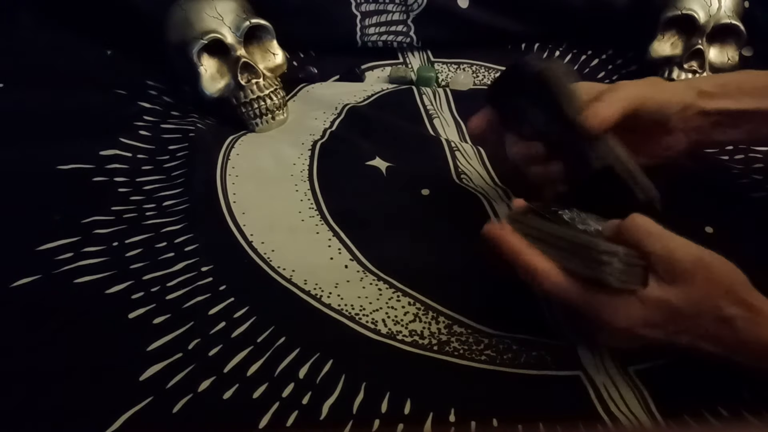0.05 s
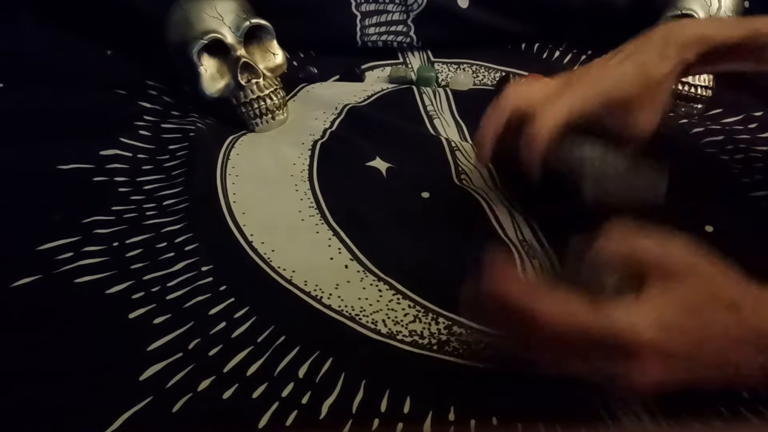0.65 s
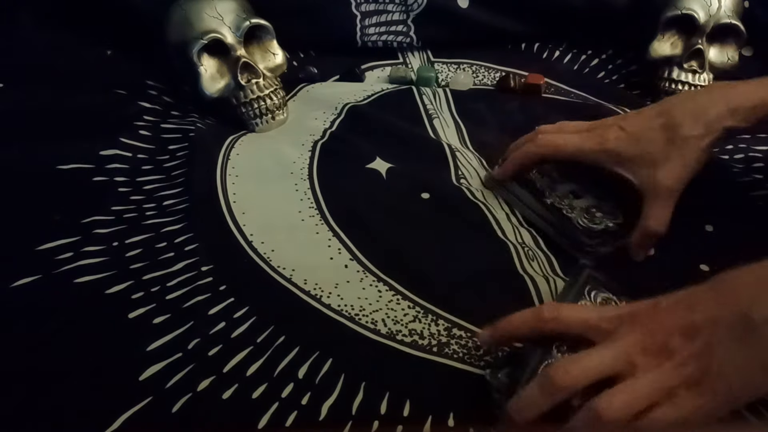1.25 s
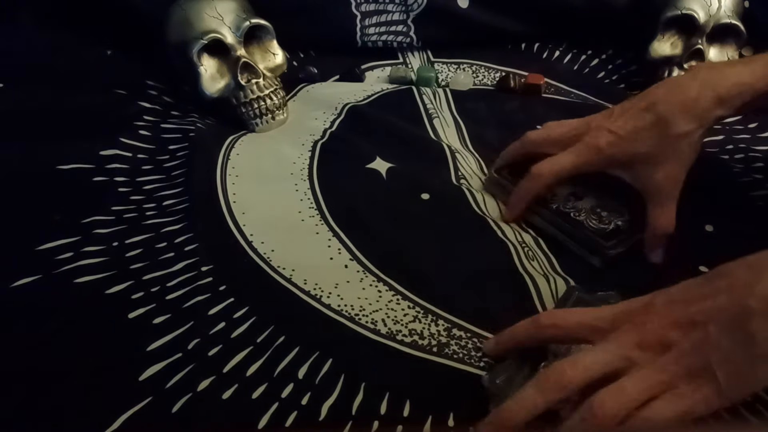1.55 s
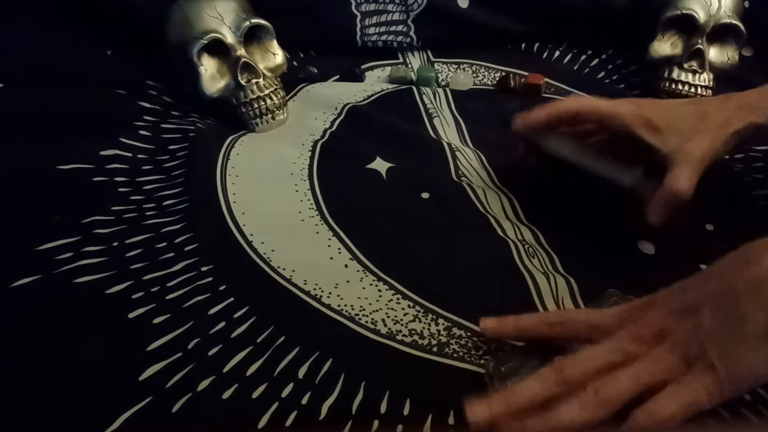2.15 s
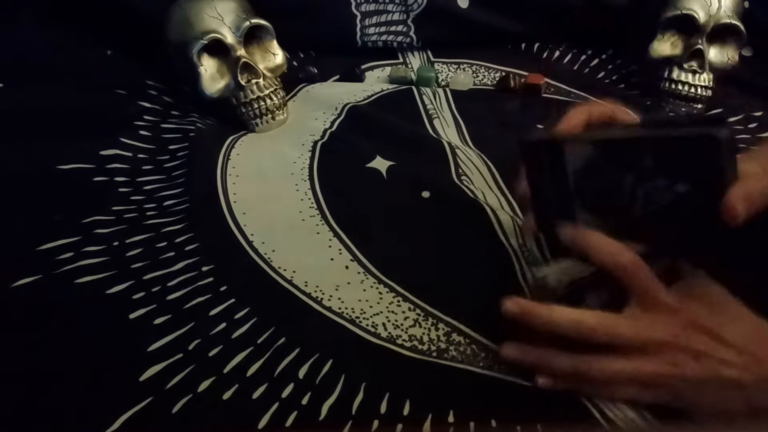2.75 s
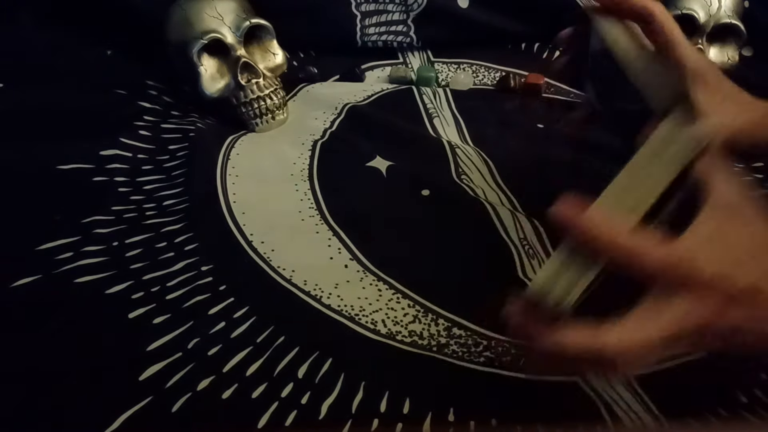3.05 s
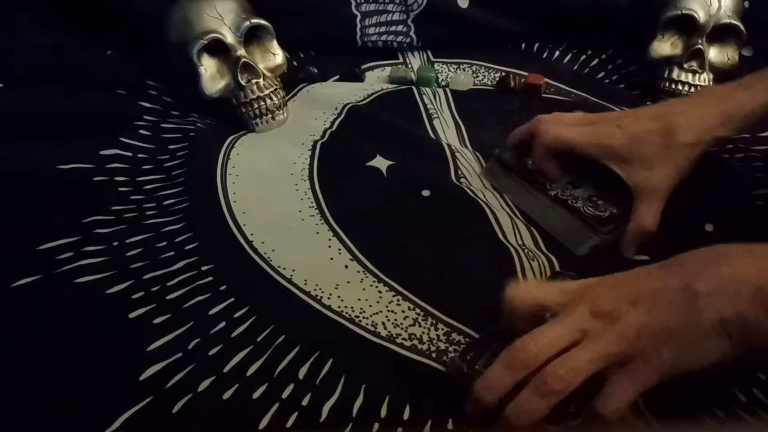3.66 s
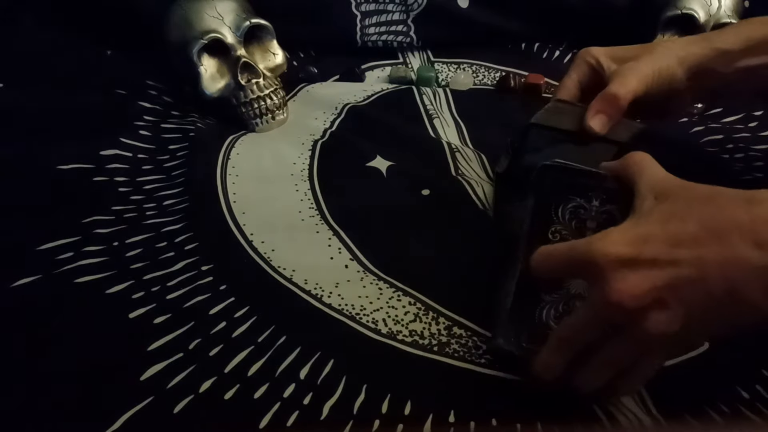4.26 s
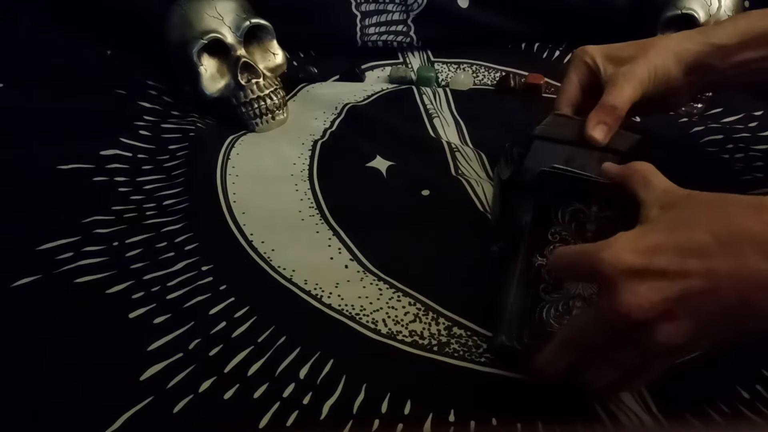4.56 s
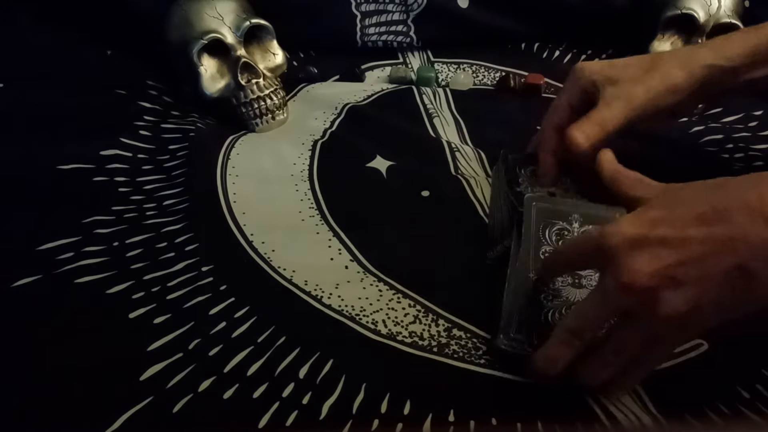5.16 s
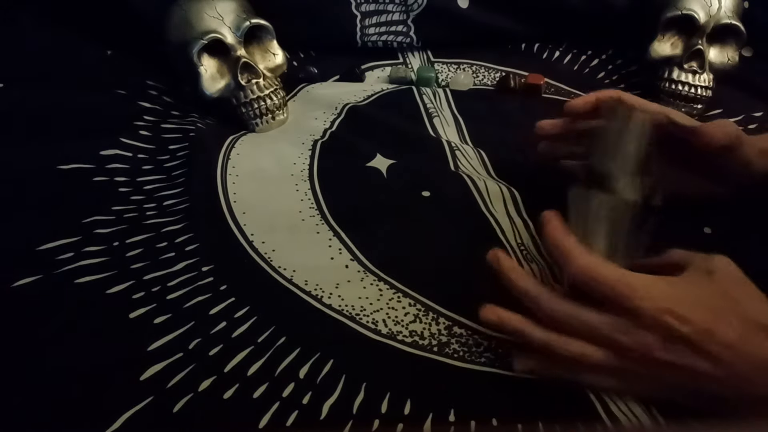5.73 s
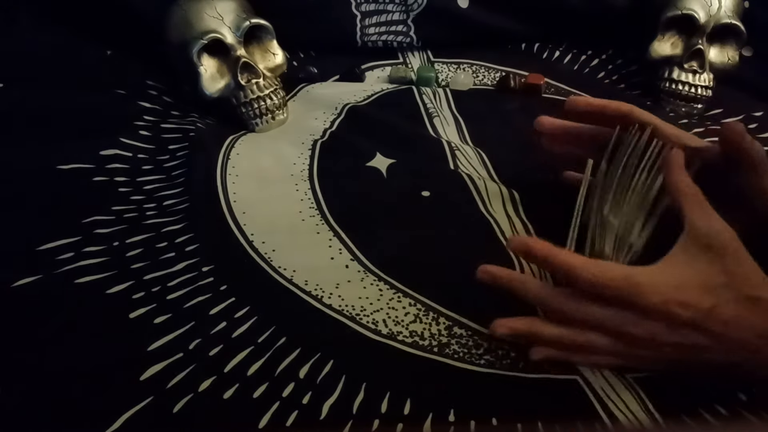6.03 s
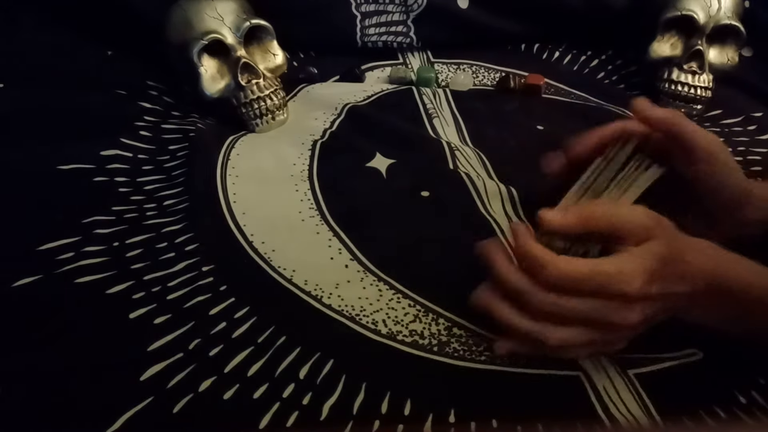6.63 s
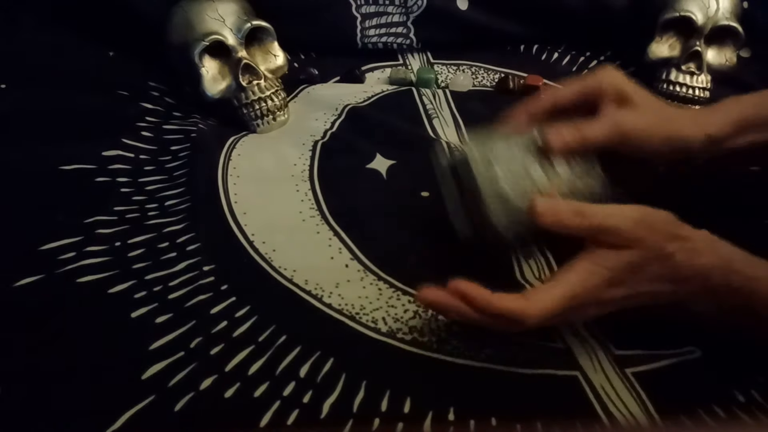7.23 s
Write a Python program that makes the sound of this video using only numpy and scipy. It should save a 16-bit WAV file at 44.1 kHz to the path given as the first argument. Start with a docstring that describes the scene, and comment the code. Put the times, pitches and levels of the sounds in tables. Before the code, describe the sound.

Hands handle and riffle shuffle playing cards on a cloth-covered table, with light knocks and slides, while a fan hums in a small room.

```python
"""Riffling a deck of cards

A deck is cut, riffled and squared by hand on a cloth-covered table in a small room.
Packets clack and ring the table; card faces hiss as they slide. In the riffle, bunches snap
off the thumbs with an edge click and a hollow flap, single cards ticking in between.
Near walls throw every snap back; a fan hums steadily."""
import sys
import numpy as np
from scipy import signal
from scipy.fft import rfft, irfft, next_fast_len
from scipy.io import wavfile
from scipy.ndimage import uniform_filter1d

SR = 44100
rng = np.random.default_rng(int(sys.argv[2]) if len(sys.argv) > 2 else 0)


def store_wav(level_fs):
    """Save 16-bit WAV to argv[1]."""
    pcm = np.round(np.clip(np.atleast_2d(level_fs), -1, 1) * 32767)
    wavfile.write(sys.argv[1], SR, pcm.T.astype(np.int16))


N = 325899
T = np.arange(N) / SR
RIFFLE_FROM_S, RIFFLE_TO_S = 4.29, 5.16

# hollow flap of a card: f/flap pitch, level/dB
FLAP_SPECTRUM = [(.04, -8), (.1, -2), (.2, -9.5), (.36, -15), (.55, -5.5), (.82, -1.5), (1.1, -2),
                 (1.4, -9), (1.7, -6), (2.1, -22), (4, -40)]
# click of its edge: f/Hz, level/dB
EDGE_SPECTRUM = [(1500, -41), (3000, -2.5), (3700, -2.5), (4800, 2), (6600, -4), (7700, -1), (9000, -5),
                 (11500, -2.5), (15500, -8.5), (17000, -54)]
# diffuse sound, left against right: f/Hz, coherence/1
COHERENCE = [(60, 0.95), (200, 0.95), (380, 0.9), (700, 0.69), (1300, 0.21), (2400, 0.24), (4400, 0),
             (16000, 0)]


def amp(db):
    """Decibels to gain."""
    return 10 ** (np.asarray(db) / 20)


def unit(x):
    """Scale to rms 1."""
    return x / np.sqrt(np.mean(x ** 2) + 1e-30)


def read(points, hz):
    """Interpolate a table over log frequency."""
    f, value = np.transpose(points)
    return np.interp(np.log(hz + 1), np.log(f + 1), value)


def add(mix, at_s, sound):
    """Mix a sound in, in place."""
    part = mix[..., max(round(at_s * SR), 0):][..., :sound.shape[-1]]
    part += sound[..., :part.shape[-1]]


def colour(x, spectrum, size=1024):
    """Minimum-phase filter with the given spectrum."""
    log_gain = np.log(amp(read(spectrum, abs(np.fft.fftfreq(size, 1 / SR)))))
    response = np.fft.ifft(np.exp(np.conj(signal.hilbert(log_gain)))).real
    return signal.fftconvolve(x, response[None], axes=1)[:, :x.shape[1]]


def shade(x, balance):
    """Tilt left against right by frequency, at constant total power."""
    size = next_fast_len(N)
    ratio = amp(read(balance, np.fft.rfftfreq(size, 1 / SR)))
    gains = np.array([ratio, np.ones_like(ratio)]) * np.sqrt(2 / (1 + ratio ** 2))
    return irfft(rfft(x, size) * gains, size)[:, :N]


def noise(gain_at):
    """Shaped stereo noise, rms 1, incoherent in the treble."""
    size = next_fast_len(N)
    hz = np.fft.rfftfreq(size, 1 / SR)
    left, other = rfft(rng.standard_normal((2, size)))
    same = read(COHERENCE, hz)
    right = same * left + np.sqrt(1 - same ** 2) * other
    return unit(irfft(np.array([left, right]) * gain_at(hz), size)[:, :N])


def crack(length_s, spectrum, chatter, width, swell=0.19, size=2048):
    """A click, then a burst of card on card that swells and stops; energy of 3 ms at rms 1."""
    t = np.arange(size) / SR
    shared, own = rng.standard_normal(size), rng.standard_normal((2, size))
    catches = np.repeat(.4 + rng.exponential(1, size), 8)[:size]
    envelope = (1 - np.exp(-t / (swell * length_s))) * np.exp(-(t / length_s) ** 3)
    grains = (shared + width * own) * catches * envelope
    drive = (t == 0) + chatter * grains / np.linalg.norm(grains[0])
    return unit(colour(drive, spectrum)) * np.sqrt(.003 * SR / size)


def room_tail(onset_s=0.0079, size=22050):
    """Diffuse tail of energy 1: builds softly, lasts longest in the low mids."""
    decay = [(100, 0.18), (500, 0.29), (2000, 0.16), (6000, 0.16), (16000, 0.17)]  # f/Hz, t60/s
    hz, t, bins = signal.stft(rng.standard_normal((2, size)), SR, nperseg=256)
    same = read(COHERENCE, hz)[:, None]
    bins[1] = same * bins[0] + np.sqrt(1 - same ** 2) * bins[1]
    bins *= amp(-60 * t / read(decay, hz)[:, None])
    tail = signal.istft(bins, SR, nperseg=256)[1][:, :size]
    tail *= 1 - np.exp(-(np.arange(size) / SR / onset_s) ** 4)
    return tail / np.linalg.norm(tail[0])


def room(x, echo_db, tail_db, smear=1.7, shift_s=0.00027, patterns=5, steps_per_s=20):
    """Near-wall echoes and a short tail; patterns crossfade in turn, so the room has no fixed ring."""
    echoes = [(0.0103, -3), (0.0125, -6), (0.0172, -2), (0.022, -8)]  # first reflections: delay/s, relative level/dB
    wall_spectrum = [(100, -2.5), (300, 1.5), (700, -1.5), (1500, -4.5), (2500, 4), (4500, 3.5), (6500, 0),
                     (9000, 0), (16000, 3)]  # more treble than midrange: f/Hz, gain/dB
    out, taps = x.copy(), np.arange(64)
    for k in range(patterns):
        response = amp(tail_db) * room_tail()
        for delay_s, db in echoes:
            # furniture scatters the treble
            scatter = np.diff(rng.standard_normal((2, 65))) * np.exp(-taps / 14)
            bounce = (taps == 0) + smear * scatter / np.linalg.norm(scatter[0])
            bounce /= np.linalg.norm(bounce[0])
            add(response, delay_s + shift_s * rng.uniform(-0.91, 1), amp(db + echo_db) * bounce)
        response = colour(response, wall_spectrum) * amp([[.8], [-.8]])
        steps_away = (T * steps_per_s - k + patterns / 2) % patterns - patterns / 2
        crossfade = np.clip(2 - 3 * abs(steps_away), 0, 1)
        out += signal.oaconvolve(x * crossfade, response, axes=1)[:, :N]
    return out


def fan(air_db=-44.5, hiss_db=-69, hum_hz=240.3, hum_db=-44):
    """Rushing air, stirred room resonances and a wavering motor hum, over faint hiss."""
    air_spectrum = [(25, -48), (52, -40), (75, -7), (92, -10.5), (115, -9), (165, -5), (215, 2), (270, -2),
                    (310, -11.5), (500, -8), (850, -13.5), (2200, -21.5), (3200, -32.5), (5000, -37)]  # f/Hz, level/dB
    hiss_spectrum = [(2000, -23), (4800, 2), (6500, -2.5), (9500, -2), (12200, 1), (14000, -5.5),
                     (15700, -6), (16500, -30)]  # f/Hz, level/dB
    room_modes = [(68.9, 3, -56), (134.4, 9.6, -48), (190.2, 3.6, -52), (239, 7.7, -56), (481.3, 12, -61),
                  (620, 17, -59.5)]  # f/Hz, width/Hz, rms level/dB

    def resonances(hz):
        """Power sum of narrow peaks."""
        peaks = [amp(db) * unit(1 / (1 + ((hz - mode_hz) / (0.82 * width_hz)) ** 2))
                 for mode_hz, width_hz, db in room_modes]
        return np.linalg.norm(peaks, axis=0)

    drones = np.linalg.norm(amp(np.transpose(room_modes)[2])) * noise(resonances)
    rates_hz = np.geomspace(.2, 4, 12)
    waver = unit(sum(np.sin(2 * np.pi * (hz * T + rng.random())) / np.sqrt(hz) for hz in rates_hz))
    hum = amp(hum_db) * unit(np.sin(2 * np.pi * hum_hz * T + 0.23 * waver))
    air = amp(air_db) * noise(lambda hz: amp(read(air_spectrum, hz)) / (1 + (hz / 6000) ** 4))
    hiss = amp(hiss_db) * noise(lambda hz: amp(read(hiss_spectrum, hz)))
    return (drones + hum + air) * amp([[-.4], [.4]]) + hiss


def slides(grain_db=2.0):
    """Card faces hiss as they slide, swelling and fading with the speed of each stroke."""
    strokes = [(0.308, -62.5, .062), (0.489, -51.5, 0.034), (0.762, -59.5, .053), (2.372, -64.5, 0.067),
               (2.843, -60, 0.044), (3.668, -60, 0.027), (3.751, -57.5, 0.02), (5.29, -59, 0.023),
               (5.608, -59, 0.038), (5.74, -64.5, .058), (5.855, -50.5, 0.034), (6.028, -54, 0.028),
               (6.227, -56.5, 0.035), (6.492, -59.5, .055), (6.623, -61.5, .036), (6.742, -53.5, .026),
               (6.967, -61.5, 0.07), (7.18, -61, 0.037)]  # centre t/s, level/dB, half length/s
    friction_spectrum = [(500, 6), (1400, 4), (2600, 8.5), (3600, 5), (4900, 7.5), (6700, 0), (8000, 4.5),
                         (9500, 1.5), (12200, 7), (15500, 2), (16500, -9)]  # f/Hz, level/dB
    power = sum(amp(db) ** 2 * np.exp(-((T - at_s) / half_s) ** 2) for at_s, db, half_s in strokes)
    grain = amp(grain_db * unit(uniform_filter1d(rng.standard_normal(N), 60)))
    hiss = noise(lambda hz: amp(read(friction_spectrum, hz)))
    return np.sqrt(power) * unit(grain * hiss)


def thumps(spread_s=0.0046, size=16384):
    """Packets and hands land: a soft push rings the table, air claps out from underneath."""
    landings = [(0.4454, -28.5, 0.00052, 270, -34), (.456, -29, 0.00075, 200, -22),
                (0.4696, -23, 0.00075, 280, -19), (0.4747, -21, 0.0014, 148, -48),
                (0.82, -39, .0014, 140, -27), (2.593, -33, 0.0017, 120, -24.5),
                (2.733, -26, 0.00063, 100, -22), (3.51, -38, 0.003, 110, -49),
                (5.562, -28, 0.00088, 218, -59)]  # t/s, peak level/dB, contact/s, most struck f/Hz, clap level/dB
    table_modes = [(104, 2.5, 0.1), (137, 2, 0.15), (200, 10, 0.055), (225, 2.5, 0.073), (269.5, 5.5, 0.11),
                   (317, -15, 0.061), (395, 4.5, 0.04), (522, -27, .1)]  # f/Hz, level/dB, t60/s
    clap_spectrum = [(.04, -1), (.09, 15), (.24, 8.5), (.39, -4), (.57, -6), (.9, -10.5), (1.4, -35),
                     (3, -50)]  # f/(cycles per contact time), level/dB
    out, t = np.zeros((2, N)), np.arange(size) / SR
    hz, mode_db, t60_s = np.transpose(table_modes)[:, :, None]
    for at_s, db, contact_s, struck_hz, clap_db in landings:
        reach_db = -5 * np.log2(hz / struck_hz) ** 2  # the place of the blow favours some modes
        modes = (amp(mode_db + reach_db - 60 * t / t60_s) * np.sin(2 * np.pi * hz * t)).sum(0)
        modes *= 1 - np.exp(-t / spread_s)  # bending wave crossing the top
        push = t * np.exp(-t / contact_s)
        thud = signal.fftconvolve(modes, push)[:size]
        add(out, at_s, amp(db) * thud / abs(thud).max())
        clap = crack(0.00092, np.array(clap_spectrum) / [contact_s, 1], chatter=0.38, width=0.36)
        add(out, at_s, -amp(clap_db) * clap)
    return out


def knocks(settle_s=0.00039, size=4096):
    """A tight packet clacks like wood as its cards settle; a firmer grip damps it sooner."""
    blows = [(0.446, -31, 1350, .012), (.4555, -35, 1410, .012), (0.4701, -28, 920, 0.019),
             (0.821, -32, 900, .012), (2.7328, -25, 850, 0.025), (3.2232, -25, 1280, 0.0075),
             (3.228, -25.5, 1280, 0.028), (4.867, -15.5, 1190, 0.0079), (4.8787, -15, 1370, .02),
             (5.1238, -5.5, 1280, 0.014), (5.133, -16.5, 1370, 0.032)]  # t/s, level/dB, main mode f/Hz, t60/s
    packet_modes = [(.74, -4.5, 1), (1, 4, 0.94), (1.14, -1, 0.79), (1.55, -5, 0.85), (2, -12, 0.72)]  # f/main mode, level/dB, t60/blow t60
    out, t = np.zeros((2, N)), np.arange(size) / SR
    ratio, mode_db, t60_share = np.transpose(packet_modes)[:, :, None]
    for at_s, db, hz, t60_s in blows:
        decay = amp(mode_db - 60 * t / (t60_s * t60_share))
        modes = (decay * np.cos(2 * np.pi * hz * ratio * t)).sum(0)
        add(out, at_s, amp(db) * modes * (1 - np.exp(-t / settle_s)) / 2)
    return out


def rub(riffle_db=-53.5, fade_s=0.072, push_s=5.3, push_db=-58, push_half_s=0.036,
        flap_hz=1600, grain_db=6, edge_db=-4, width=0.37):
    """Edges scrape in tiny catches during the riffle, and again as the halves are pushed together."""
    catches = amp(grain_db * np.repeat(rng.standard_normal(N), 32)[:N])
    shared, own = catches * rng.standard_normal(N), catches * rng.standard_normal((2, N))
    body = unit(colour(shared + width * own, np.array(FLAP_SPECTRUM) * [flap_hz, 1]))
    edge = amp(edge_db) * unit(colour(own, EDGE_SPECTRUM))
    outside_s = np.maximum(RIFFLE_FROM_S - T, 0) + np.maximum(T - RIFFLE_TO_S, 0)
    riffle = amp(riffle_db) * np.exp(-outside_s / fade_s)
    push = amp(push_db) * np.exp(-((T - push_s) / push_half_s) ** 2)
    return unit(body + edge) * (riffle + push)


def twangs(length_s=0.0024):
    """Narrow twangs of tightly bent card edges, one followed by a bright wall echo."""
    events = [(4.4173, -20, 5100), (4.4278, -31, 5300), (4.657, -28, 6160), (7.131, -52, 11500)]  # t/s, level/dB, pitch/Hz
    ring_spectrum = [(.4, -32), (.7, -13), (.86, 3), (1.02, 5), (1.25, -5), (2, -13)]  # f/pitch, level/dB
    out = np.zeros((2, N))
    for at_s, db, hz in events:
        twang = crack(length_s, np.array(ring_spectrum) * [hz, 1], chatter=0.67, width=1.0)
        add(out, at_s, amp(db) * twang)
    return out


def snap(length_s, flap_db, edge_db, flap_hz, tilt_db_per_oct=0, chatter_per_s=1400):
    """One card snap: hollow flap, bright edge click and a dull pat; longer snaps chatter more."""
    pat_spectrum = [(100, -7.5), (250, -3), (450, -1), (700, -3), (1100, -12), (3000, -35)]  # dull landing on cloth: f/Hz, level/dB
    flap_spectrum = np.array(FLAP_SPECTRUM) * [flap_hz, 1]
    edge_spectrum = [(hz, db + tilt_db_per_oct * np.log2(hz / flap_hz)) for hz, db in EDGE_SPECTRUM]
    chatter = chatter_per_s * length_s
    pat_db = -17.5 + 0.76 * flap_db  # the cloth cushions hard snaps
    flap = amp(flap_db) * crack(0.99 * length_s, flap_spectrum, chatter, width=0.25)
    edge = amp(edge_db) * crack(length_s, edge_spectrum, chatter, width=3.6)
    pat = amp(pat_db) * crack(length_s, pat_spectrum, chatter, width=0.35)
    return flap + edge + pat


def strays(cards_per_s=22):
    """Single cards tick off the thumbs at uneven steps through the riffle."""
    out = np.zeros((2, N))
    slots_s = np.arange(RIFFLE_FROM_S, RIFFLE_TO_S, 1 / cards_per_s)
    times_s = slots_s + rng.random(len(slots_s)) / cards_per_s
    for at_s in times_s[times_s < RIFFLE_TO_S]:
        add(out, at_s, snap(length_s=0.0026, flap_db=-51, edge_db=-49, flap_hz=1600))
    return out


def snaps():
    """Snaps of riffling and handling the deck, a few followed by a bright wall echo."""
    # t/s, length/s, flap level/dB, edge level/dB, flap pitch/Hz, edge tilt/(dB per octave)
    events = [(1.2214, .003, -64, -55, 1600, 1), (2.055, 0.0029, -54, -56.5, 1600, -2),
              (2.7335, 0.0042, -39.5, -41.5, 1500, -2.5), (2.907, 0.0024, -48, -60, 1600, 0),
              (3.2245, 0.0014, -50, -48, 1500, -1), (3.2275, 0.0041, -35.5, -48.5, 1540, 0),
              (3.52, .0025, -47, -55, 1600, 0), (4.26, 0.0045, -41, -49, 1200, -9),
              (4.282, 0.0037, -39, -39, 1500, 2), (4.287, 0.0026, -34.5, -37, 1510, -5),
              (4.295, 0.0035, -32, -29.5, 1410, 2), (4.325, .0038, -36, -39, 1530, -1),
              (4.3544, 0.0052, -33, -31.5, 1740, 0.5), (4.363, 0.0032, -42, -39, 1700, 0),
              (4.387, 0.0089, -30, -34, 1670, 1), (4.4178, 0.0015, -24.5, -22, 1600, 0.5),
              (4.429, 0.0013, -41, -28.5, 2200, -6), (4.518, 0.0009, -44, -57, 1200, -2),
              (4.523, 0.0039, -32, -39, 1050, -2), (4.553, 0.0023, -25.5, -29.5, 1680, 2),
              (4.571, 0.011, -24.5, -24.5, 1600, -5), (4.609, 0.0021, -28.5, -33, 1550, 0),
              (4.6187, 0.005, -30, -23, 1790, 1), (4.635, .0061, -34, -28, 1900, 5),
              (4.644, 0.0015, -26.5, -36, 1540, 2), (4.6586, 0.0018, -30.5, -20, 1600, 5),
              (4.69, .0032, -25, -28.5, 1750, 0), (4.696, 0.0027, -37, -50, 1900, 0),
              (4.739, 0.0012, -31.5, -40, 1190, -5), (4.749, .003, -48, -40, 1600, -3),
              (4.765, 0.0037, -35, -53, 1740, 0), (4.7712, 0.00077, -21, -18.5, 1970, 6),
              (4.772, 0.0029, -29, -21.5, 1900, 2), (4.7917, 0.0047, -24, -22, 1560, 2.5),
              (4.815, 0.0041, -41, -40, 1600, 4), (4.857, 0.0076, -34, -36, 1436, -5),
              (4.8786, 0.00076, -20.5, -19.5, 1450, -4), (4.879, 0.0042, -19, -19.5, 1600, 1.5),
              (4.9063, 0.0053, -23.5, -24, 1560, 2), (4.96, .004, -35, -36, 1350, -3),
              (4.968, 0.01, -22, -26.5, 1770, 3), (4.974, .0035, -21, -31, 1800, 5),
              (4.9813, 0.0063, -20.5, -24.5, 1600, -3), (5.0023, 0.0048, -21.5, -25, 1530, 0),
              (5.034, 0.002, -31, -35, 1500, -4), (5.059, 0.0078, -45, -35.5, 1500, -5),
              (5.068, .0021, -29.5, -39, 1420, -3), (5.091, 0.0062, -16, -21.5, 1730, 1),
              (5.121, .0021, -26, -40, 1300, 0), (5.1231, 0.0026, -25, -29, 1390, 2),
              (5.132, 0.0054, -20, -22, 1554, -2), (5.168, 0.003, -30.5, -31.5, 1500, -1),
              (7.129, 0.0039, -66, -50, 1600, 7)]
    out = np.zeros((2, N))
    for at_s, *settings in events:
        add(out, at_s, snap(*settings))
    return out


def scene(low_cut_hz=80):
    """Hands work on the right, so snaps and knocks reach the left later and duller; fan behind."""
    hands_balance = [(500, 0), (2000, 0), (3300, -1), (5500, -3), (9000, -4.5), (15000, -10.5)]  # f/Hz, left minus right/dB
    soft_balance = [(1300, .5), (2400, 5), (4400, 0), (8100, -2), (15000, -21)]  # slides and fan: f/Hz, left minus right/dB
    cards = room(snaps() + twangs() + strays() + rub(), echo_db=-9.5, tail_db=-5.5)
    packets = room(thumps() + knocks(), echo_db=-11, tail_db=-7)
    # the low cut takes the rumble out of snaps and thumps
    low_cut = signal.butter(4, low_cut_hz, "high", fs=SR, output="sos")
    hands = signal.sosfilt(low_cut, shade(cards + packets, hands_balance))
    hands[0] = np.roll(hands[0], 3)
    return hands + shade(slides() + fan(), soft_balance)


def record(dry, cutoff_hz=16400):
    """Steep band limit."""
    low_pass = signal.firwin(255, cutoff_hz, window=("kaiser", 8), fs=SR)
    return signal.oaconvolve(dry, low_pass[None], "same", axes=1)


dry = scene()
out = record(dry)
store_wav(out)
```